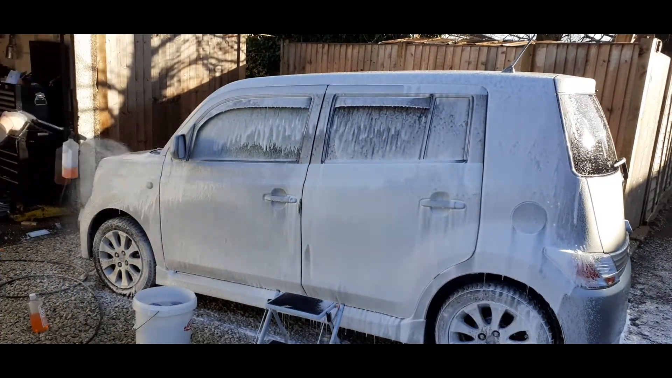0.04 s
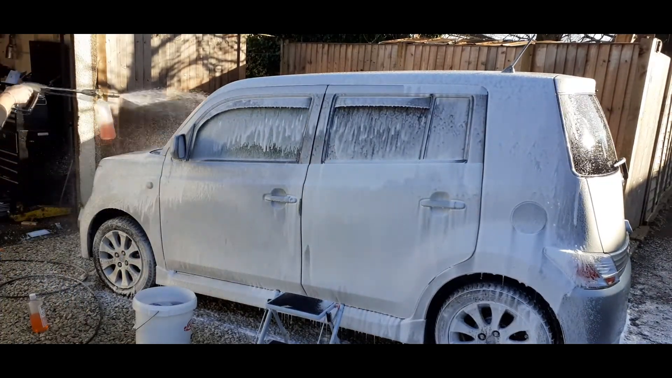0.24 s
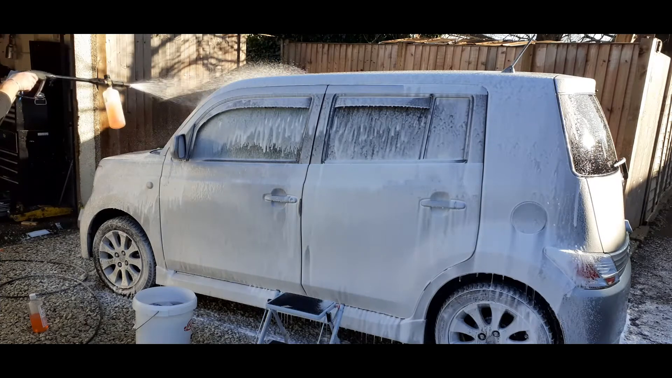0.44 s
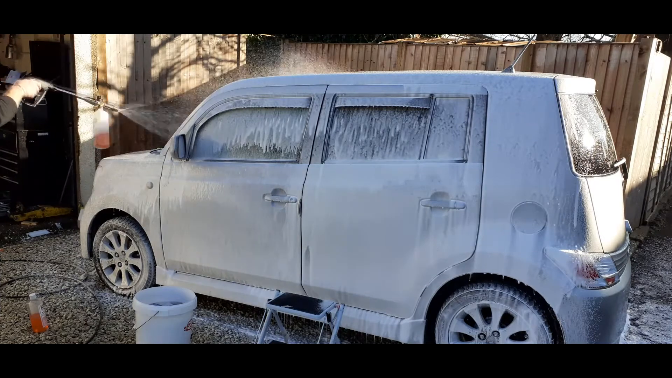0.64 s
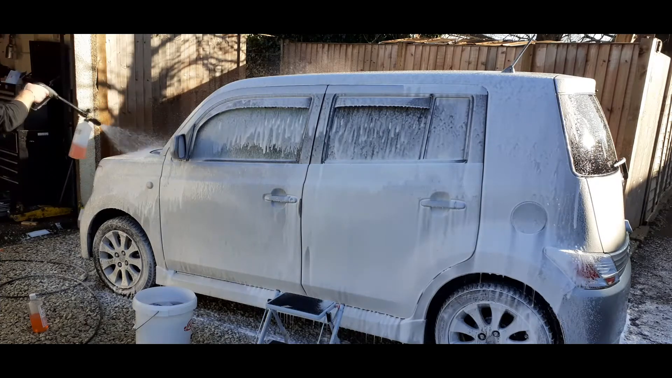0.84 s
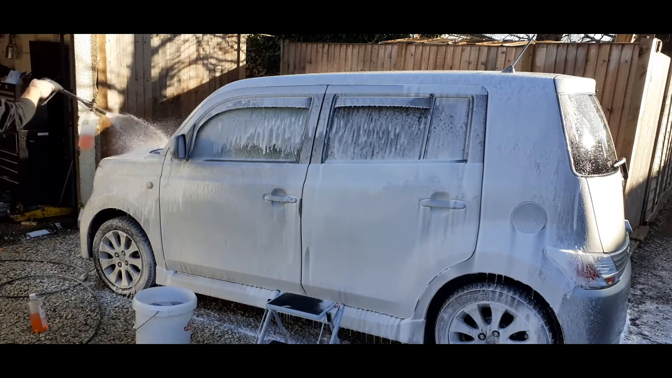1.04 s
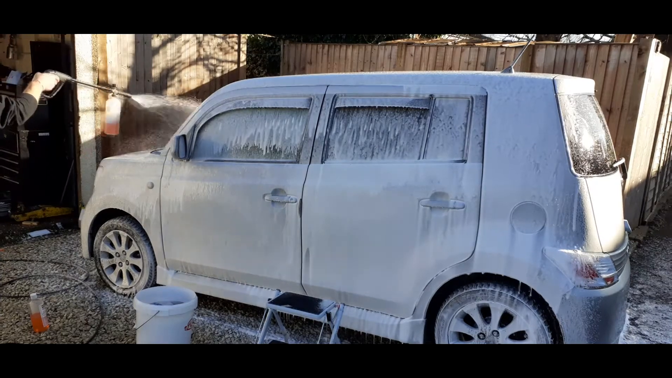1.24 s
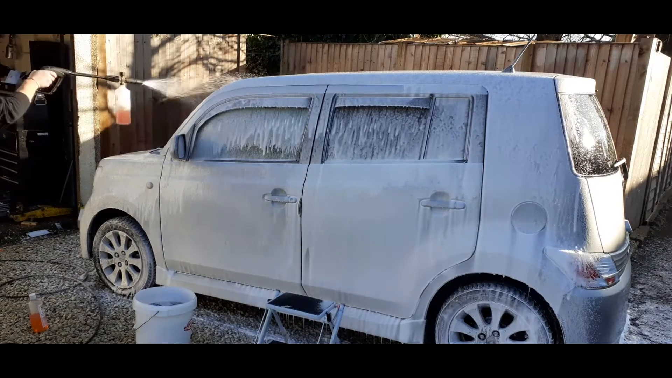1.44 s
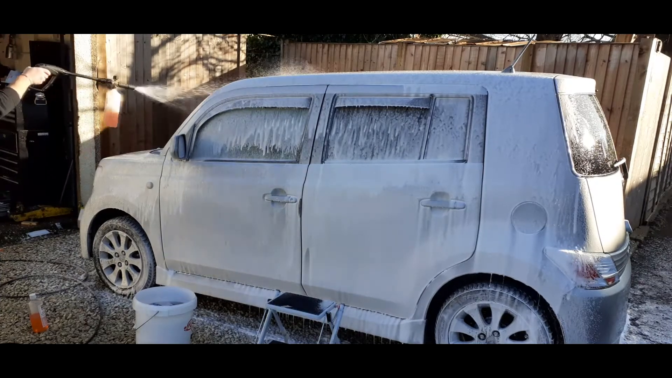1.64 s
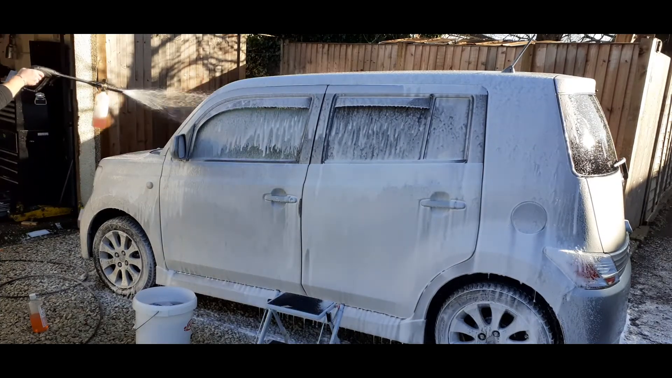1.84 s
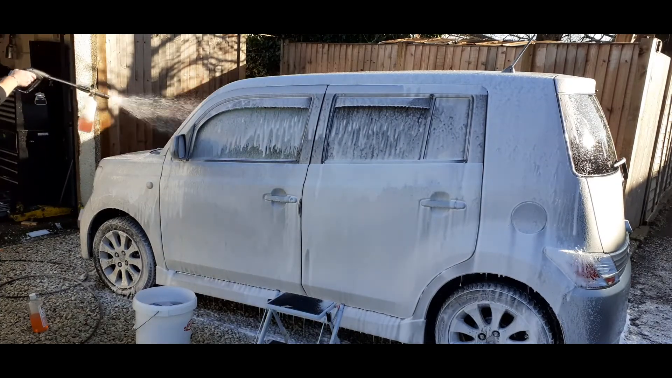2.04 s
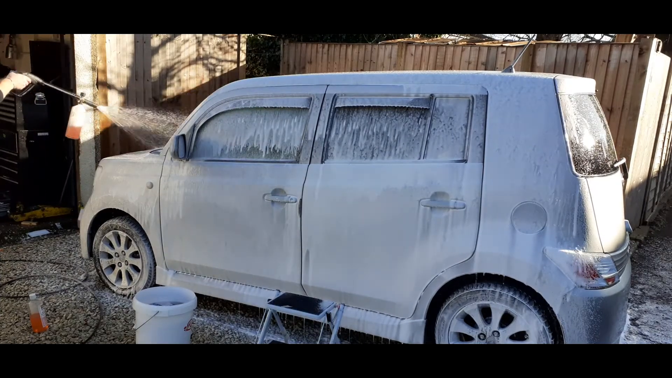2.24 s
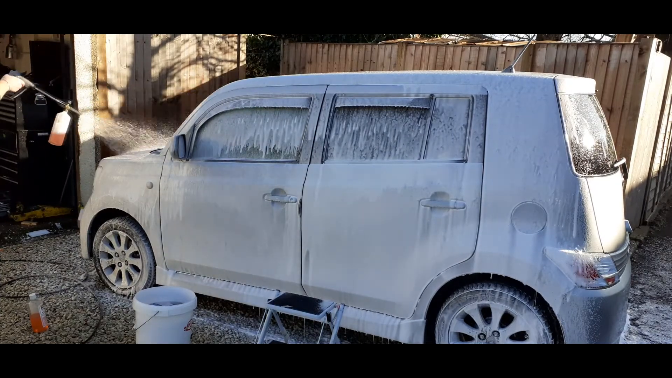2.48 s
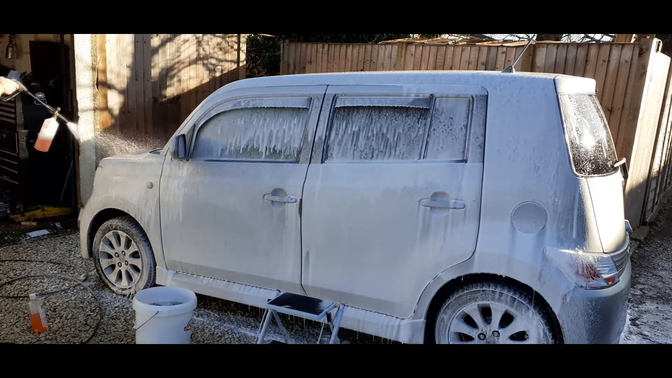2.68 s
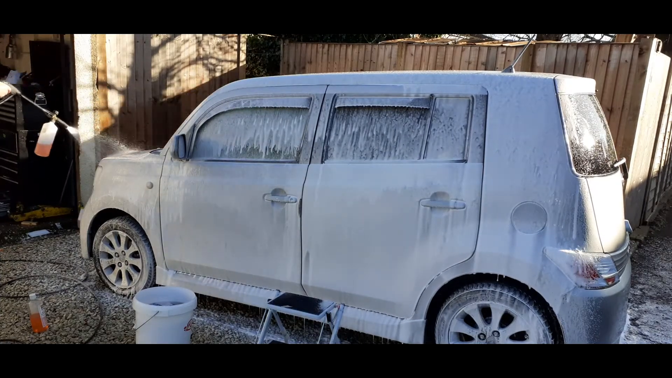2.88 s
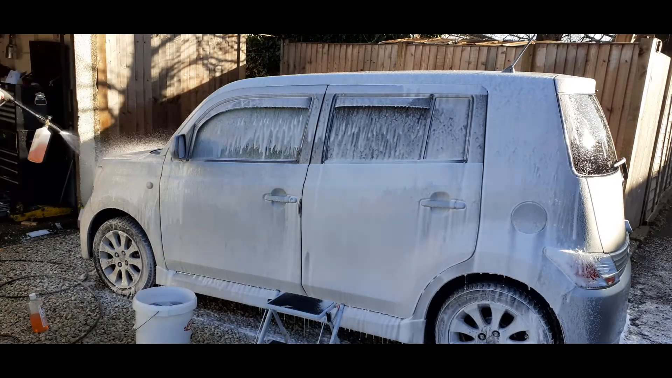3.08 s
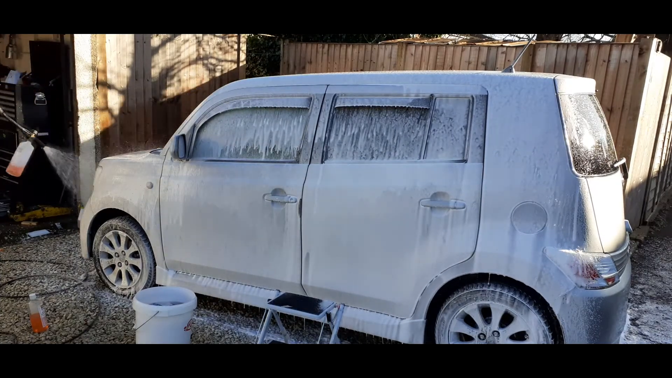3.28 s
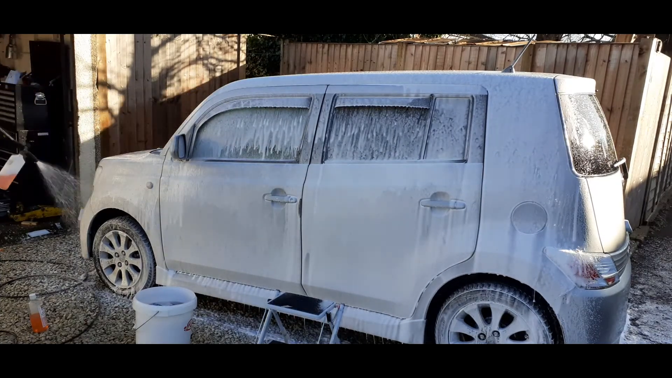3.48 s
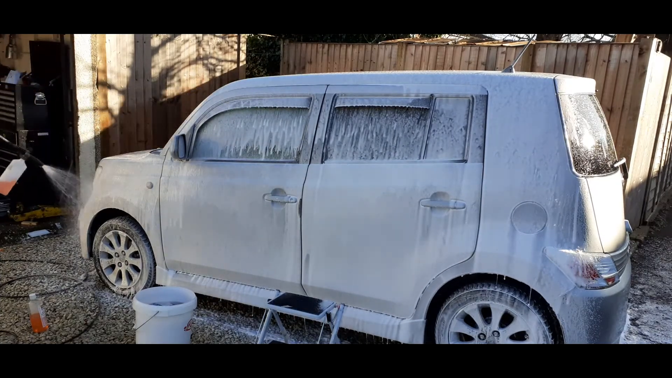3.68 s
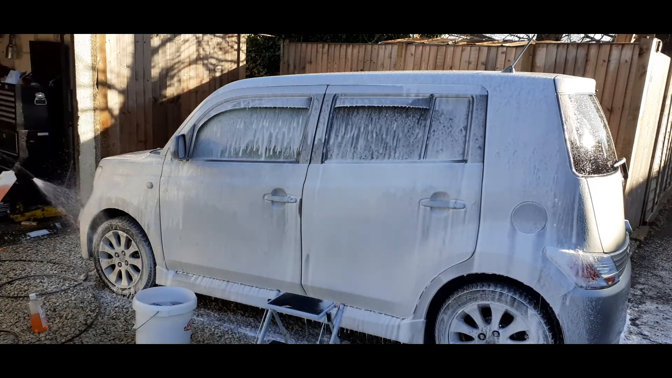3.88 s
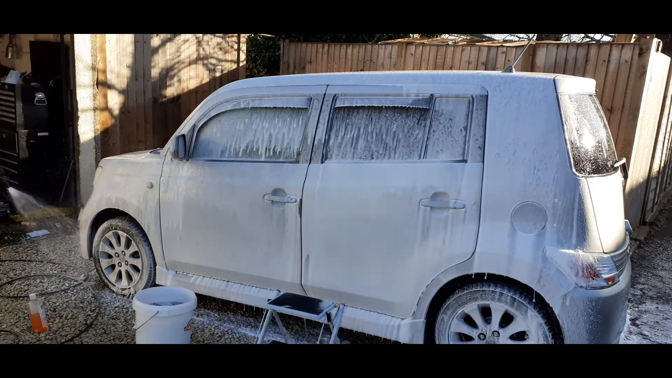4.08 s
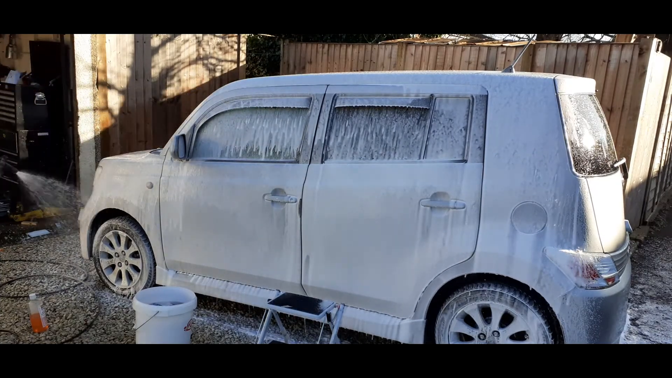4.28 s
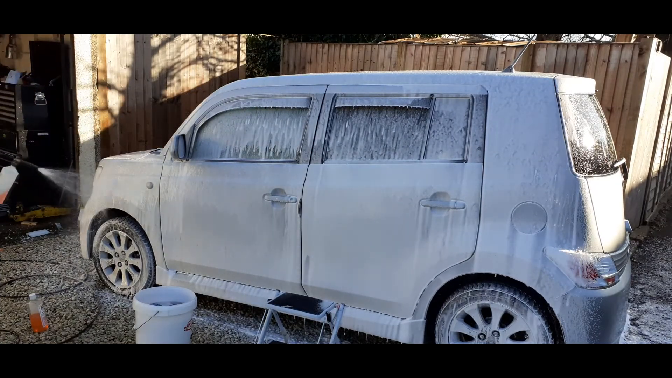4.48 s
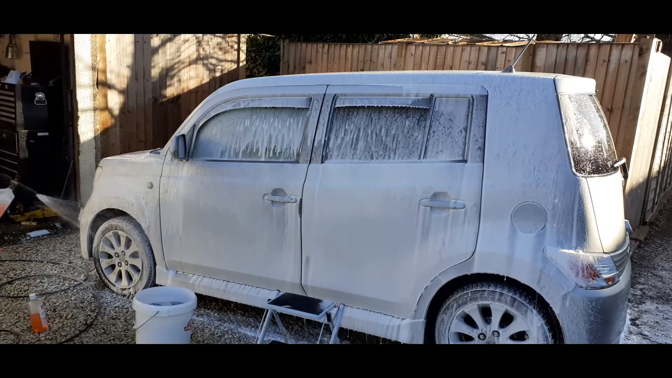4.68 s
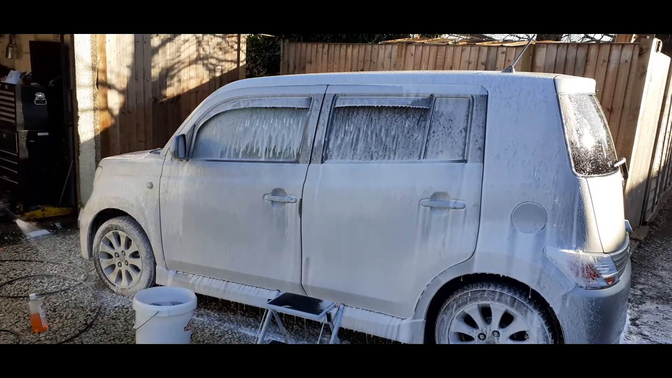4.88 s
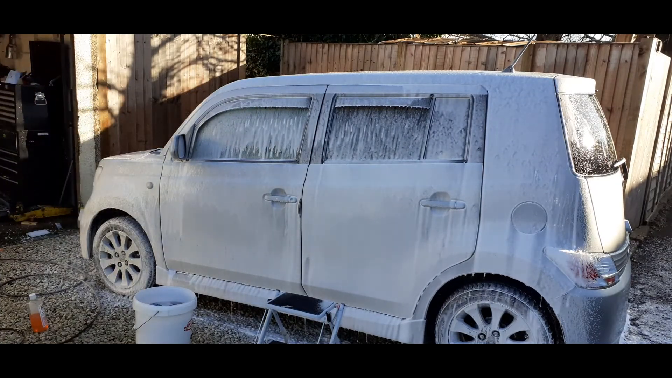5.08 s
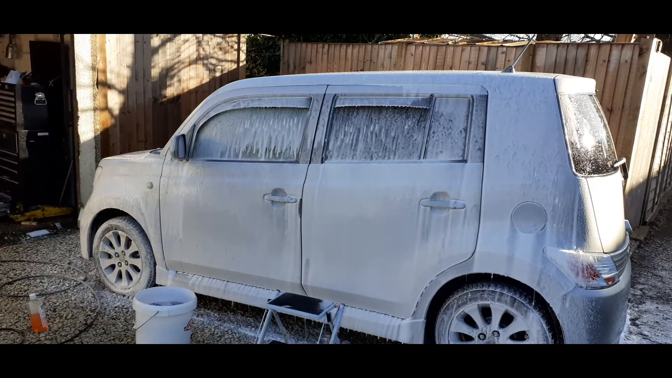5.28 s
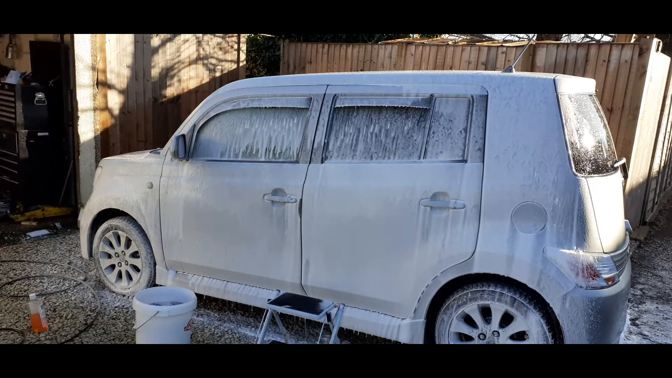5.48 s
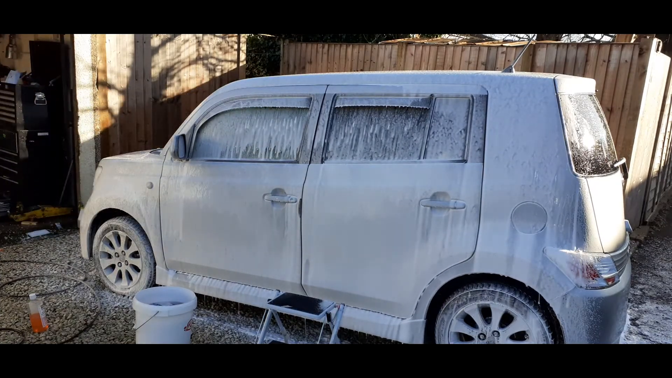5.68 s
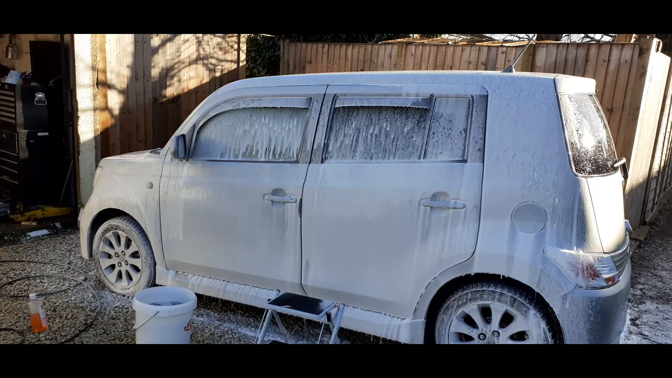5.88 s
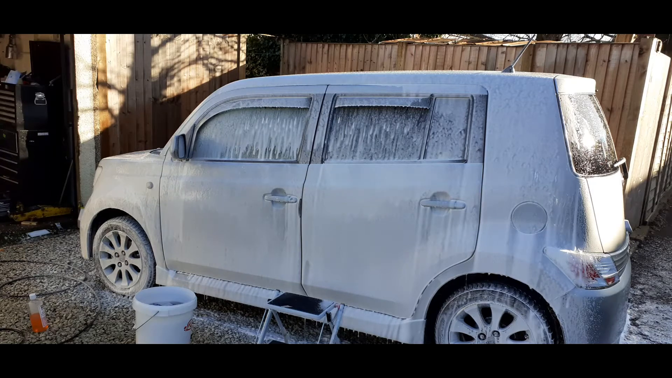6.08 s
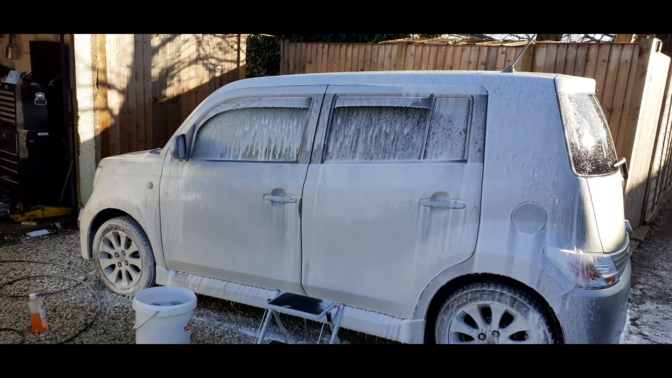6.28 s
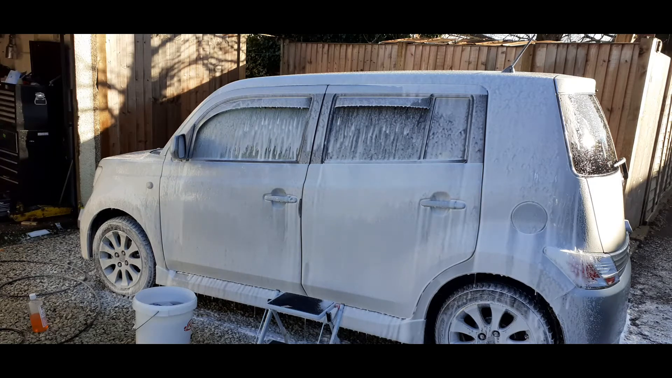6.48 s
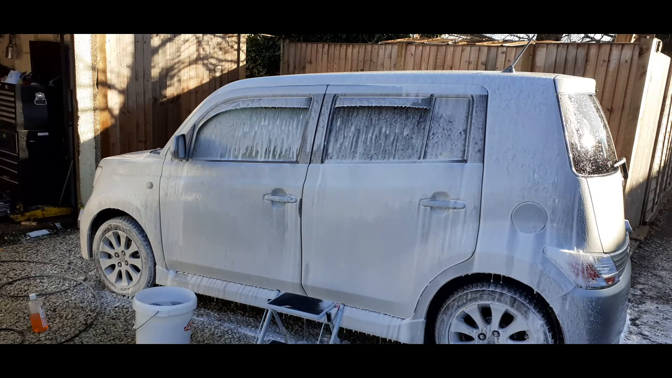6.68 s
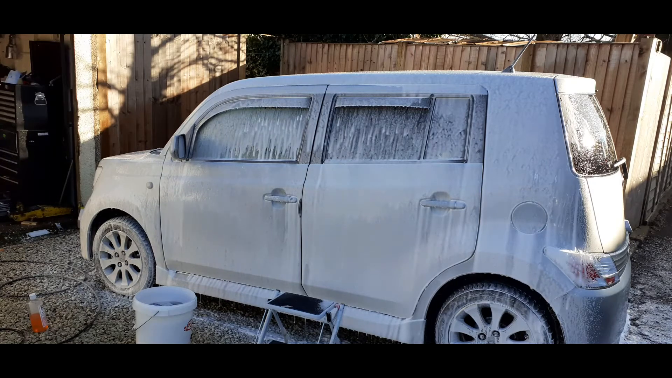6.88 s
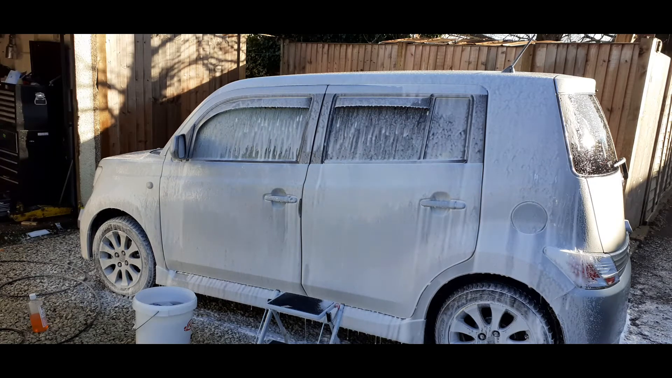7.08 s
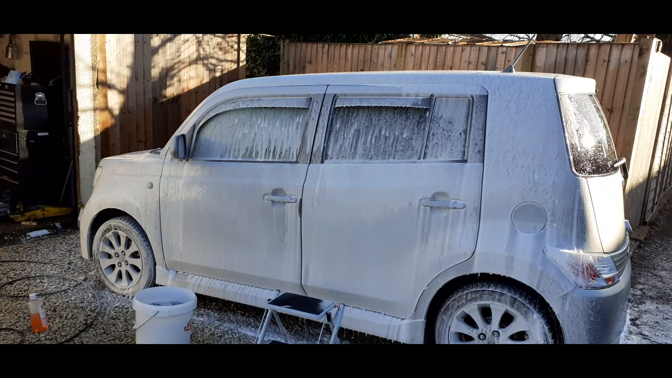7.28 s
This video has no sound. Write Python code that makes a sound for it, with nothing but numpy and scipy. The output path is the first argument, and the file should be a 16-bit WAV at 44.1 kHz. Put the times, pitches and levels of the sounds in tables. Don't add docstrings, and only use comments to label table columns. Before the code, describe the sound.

Outdoors, a steady pump hum and roaring foam spray cut out at five seconds, the valve squeals and spits, leaving quiet rustles and gravel steps.

```python
import sys
import numpy as np
from scipy import signal
from scipy.fft import rfft, irfft
from scipy.io import wavfile

SR = 44100
rng = np.random.default_rng(int(sys.argv[2]) if len(sys.argv) > 2 else 0)


def volts(x):
    e = np.asarray(x, float) / 20
    return 10 ** e


def to_wav(s):
    ch = np.atleast_2d(s).T
    pcm = np.round(np.clip(ch, -1, 1) * 32767)
    wavfile.write(sys.argv[1], SR, pcm.astype(np.int16))


N = 323234

# time_s, turns_per_s
SHAFT = [(0, 82.07), (0.5, 82.07), (1.5, 81.92), (2.0, 81.81), (2.5, 81.81), (3.0, 81.98), (4.5, 82.21)]
# multiple of shaft speed, level_db, left_over_right_db, right_lag_rad
PUMP_TONES = [(2, -53, 4, 0.3), (3, -44.5, 8, 0.2), (3.5, -60, 2, 0.4), (4, -45, 4, 0.4), (5, -47, 1, 0.7),
              (6, -41.2, 2, 0.2), (7, -46, 2, 1.1), (8, -44.5, 4, 1.3), (9, -44, -3, 0.8),
              (11, -54, 10, 1.4), (12, -47.5, -2, 1.0), (13, -53, 3, 2.4), (14, -51, 6, 2.2),
              (15, -52, 2, 2.4), (16, -53, 2, 2.7), (17, -53, 1, 2.0), (18, -54, 16, -2.6),
              (19, -53, 7, 0.8), (20, -41, 0, -0.9), (21, -45, 1, 3.0), (22, -50, 7, -2.5),
              (23, -38, 7, -3.0), (24, -50, 3, -2.9), (25, -54, 2, 1.3), (26, -49, 0, -1.0),
              (27, -53, 0, -2.8), (29, -46, 1, -1.0), (30, -52, 1, -1.8), (39, -53, 6, -0.8),
              (45, -46, 0, -0.3)]
# multiple, left_db, right_db, left_offset_rad, right_offset_rad
ROTOR_TONES = [(2, -63, -65, -2.6, -2.5), (3, -49.5, -52, 0.8, 0.8), (4, -44, -48, -0.8, -0.9),
               (5, -50, -54, 2.1, 2.6), (6, -55, -60, -1.0, -2.0), (7, -47, -57, -1.6, -0.9),
               (8, -47, -53, -2.3, -2.2)]
# multiple, middle_s, length_s, change_db
SHADOWS = [(3, 4.2, 2.2, -9), (9, 4, 1.7, -3), (12, 2.6, 2.2, 3.5), (15, 2.5, 1.4, -2), (21, 2.2, 1.6, -4),
           (22, 5.7, 2.0, 8), (17, 4.8, 2.2, -0.5), (18, 4, 2.47, 3), (26, 4.4, 2.2, 4.5)]
# time_s, level_db
POWER = [
    (0, -0.76),
    (4.99, 1.7),
    (5.03, -3),
    (5.07, -28),
    (5.12, -53),
]


def pump():
    turns = in_time(SHAFT)[0]
    angle = 2 * np.pi * np.cumsum(turns) / SR
    load_db = 6.5 * (82.0 - turns)
    rotor = {k: np.reshape(sides, (2, 2, 1)) for k, *sides in ROTOR_TONES}
    out = np.zeros((2, N))
    for k, level_db, pan_db, lag in PUMP_TONES:
        shadow_db = swells([row[1:] for row in SHADOWS if row[0] == k], .6)
        level = volts(level_db + load_db - 0.24 * drift(0.25) + 0.55 * drift(1.8)) * volts(shadow_db)
        phase = k * angle + .35 * k * k + .015 * k * drift(4) - [[0], [lag]]
        out += np.sqrt(2) * level * np.sin(phase) * volts([[pan_db / 2], [-pan_db / 2]])
        if k in rotor:
            beat_db, offset = rotor[k]
            out += np.sqrt(2) * volts(beat_db) * np.sin(phase + angle / 11 + offset)
    return out * volts(in_time(POWER)[0])


# time_s, level_db
PRESSURE = [(4.931, 0), (5.0, -5.5), (5.1, -14.5), (5.178, -13), (5.36, -17), (5.55, -31), (5.6, -39),
            (5.68, -46), (5.9, -58)]
# middle_s, length_s, swell_db
DRUMMING = [
    (.03, .12, -1.5),
    (.7, 0.15, -1),
    (1.52, .05, 2),
    (2.86, 0.046, 3),
    (3.02, 0.088, 3.5),
]
# pitch_hz, level_db_per_hz
CASING_COLOUR = [(60, -30), (100, -10), (200, -8.5), (290, -6), (370, -7), (460, -6), (550, -6), (630, -4),
                 (720, -1), (820, 0), (980, -2), (1120, -5), (1280, -8), (1600, -13)]


def casing():
    sinking = 0.61 * in_time([(s + 0.16, db) for s, db in PRESSURE])[0]
    level = volts(-36.5 + sinking + swells(DRUMMING, 0.034))
    return level * rush(CASING_COLOUR, shared_db=0.8, patchy_db=1.6, lag_s=0.0002)


def lance():
    return howl() + roar() + off_bodywork(hiss() + mist(), echo_db=-13, lag_s=.0015, sway_s=.0003)


def low_pressure():
    bleeding_s = np.maximum(np.arange(N) / SR - PRESSURE[1][0], 0)
    cut_s = 5.18
    air_cut = swells([(cut_s + 2, 4, -5), (cut_s + 0.042, .09, -10)], .04)
    return 0.45 * in_time(PRESSURE)[0] - 16 * bleeding_s + air_cut


# middle_s, length_s, mist_swell_db, sheen_hz
SWINGS = [(0.021, 0.17, 6.5, 13050), (.41, 0.36, 6.5, 11030), (0.851, 0.19, 3, 14020),
          (2.99, 0.23, 2, 11390), (3.821, 0.42, 7, 12760), (4.53, .33, 7, 13210), (4.871, 0.28, 6.5, 13000)]


def swing():
    return swells([row[:3] for row in SWINGS], 0.11)


# time_s, nearer_db
NEARER = [(0, 0), (.2, 1), (.66, -0.5), (.8, 0.5), (1.5, 0.5), (1.8, 0), (2.2, -0.5), (2.6, 0), (3.05, 2.5),
          (3.2, 1.5), (3.75, 2.5), (4.12, 3.5), (4.23, 1), (4.53, 4), (4.7, 2), (4.78, 3), (4.9, 1.5)]
# pitch_hz, level_db_per_hz
HISS_COLOUR = [(1470, -27), (2500, -4), (3230, 3), (3510, 3), (3570, 3.5), (4300, 2.5), (5880, 2.5),
               (7510, 1.5), (8980, -9), (9500, -5), (12400, -13), (20900, -120)]
# time_s, pitch_hz, over_hiss_db
NOZZLE = [(0.0, 6050, -6), (0.26, 6420, -9), (1.17, 5950, -4), (1.21, 6390, -5), (2.06, 6220, -7),
          (2.1, 5865, -7), (2.45, 6290, -5), (2.62, 5910, -9.5), (3.49, 5870, -5), (3.87, 6270, -13.5),
          (4.37, 5940, -10), (4.47, 6380, -8), (4.79, 5950, -8), (5.0, 6270, -18)]


def hiss():
    level_db = -32.5 + in_time(PRESSURE)[0] + in_time(NEARER)[0] + 0.067 * swing()
    nozzle_hz, nozzle_db = in_time(NOZZLE)
    spray = volts(level_db + 0.5) * rush(HISS_COLOUR, shared_db=.8, patchy_db=1.3, lag_s=.00017)
    ring = whistle(nozzle_hz, width_hz=900, alike=.3, lag_s=.00017)
    return spray + volts(level_db + nozzle_db + 1.5 * drift(4)) * ring


# pitch_hz, level_db_per_hz
MIST_COLOUR = [(6500, -6.5), (8500, 2), (9240, -9.5), (10600, 1.1), (13000, -3.5), (15000, -0.5),
               (17000, -1)]


def mist():
    shut_s = 5.57
    shutting = swells([(5.1, .08, -4), (shut_s + 2, 4, -21)], .04)
    toward = swing()
    level_db = -38 + 0.53 * in_time(PRESSURE)[0] + 0.88 * toward + 0.43 * in_time(NEARER)[0] + shutting
    fizz = volts(level_db) * rush(MIST_COLOUR, shared_db=0.5, patchy_db=1.4, lag_s=0.00015)
    return fizz + volts(level_db - 6.5 + 0.7 * toward) * sheen()


def sheen():
    glide = []
    for s, length, _, hz in SWINGS:
        for side in (-.9, .9):
            offset_s = side * length / 2
            glide.append((s + offset_s, hz + offset_s * 5500))
    return whistle(in_time(glide)[0], width_hz=2500, alike=.3, lag_s=.00016)


# pitch_hz, level_db_per_hz
ROAR_COLOUR = [(750, -30), (1050, -9), (1300, -5), (1550, -4), (1800, -1), (2100, 0), (2450, -4),
               (2770, -6), (3400, -8), (4400, -30)]


def roar():
    level = volts(-41 + low_pressure() + 0.12 * swing() + 5)
    return level * rush(ROAR_COLOUR, shared_db=-0.5, patchy_db=1.2, lag_s=0.00026)


# middle_s, swell_db, pitch_hz
GULPS = [(.03, 7, 1930), (0.169, 14.5, 1881), (.4, 2, 1900), (.66, 11, 2062), (0.821, 7, 1903),
         (1.42, 7, 1943), (1.84, 9, 1904), (2.13, 10.5, 1868), (2.61, -3, 1864), (2.94, 12, 2035),
         (3.15, -3, 1830), (3.62, 10, 1855), (3.9, 3, 1857), (4.54, 11, 1822), (4.711, 4, 1934)]


def howl():
    gulps_db = swells([(s, 0.075, db) for s, db, _ in GULPS], 0.12)
    hz = in_time([(s, hz) for s, _, hz in GULPS])[0] + 25 * drift(4.935)
    level = volts(-37 + low_pressure() + gulps_db + 2.1 * drift(5.4) - 3.5)
    return level * whistle(hz, width_hz=200, alike=0.18, lag_s=0.00011)


def off_bodywork(x, echo_db, lag_s, sway_s):
    at = np.arange(N) - SR * (lag_s + sway_s * drift(0.904))
    return x + volts(echo_db) * np.array([np.interp(at, np.arange(N), side) for side in x])


# time_s, pitch_hz, level_db
BONNET = [(.08, 994, -62), (.16, 962, -38), (.4, 857, -40), (.7, 752, -35.5), (1.0, 723, -47),
          (1.5, 765.4, -49), (2.9, 803, -44), (3.5, 793, -50)]


def bonnet():
    hz, level_db = in_time(BONNET + [(3.8, 800, -90)])
    return volts(level_db + 2.0 * drift(8.5)) * whistle(hz, width_hz=137, alike=0.75, lag_s=0.00017)


# start_s, peak_db, pitch_hz, fade_60db_s
THUD = [
    (5.043, -25, 128, 0.087),
    (5.055, -31.5, 655, 0.33),
    (5.577, -29, 770, 0.051),
]


def thud():
    out = np.zeros(N)
    for s, peak_db, hz, t60 in THUD:
        age = np.maximum(np.arange(N) / SR - s, 0)
        rise = np.minimum(age / 0.012, 1)
        out += volts(peak_db - 60 * age / t60) * rise * np.sin(2 * np.pi * hz * age)
    return out


def coasting():
    t = np.arange(N) / SR
    start_s, rest_s = 4.99, 5.6
    turning = np.clip(np.minimum(t - start_s, rest_s - t) / 0.027 + 1, 0, 1)
    level = volts(-42.5 - 9 * (t - start_s) + 2.7 * drift(9.2) - 6.5)
    return turning * level * band_noise(98, 309.6, channels=1)


# time_s, pitch_hz, level_db
SQUEAL = [(5.112, 3230, -58), (5.128, 3230, -40), (5.16, 3220, -37), (5.222, 3030, -41),
          (5.238, 2990, -31.5), (5.285, 2945, -33.5), (5.31, 2900, -39), (5.39, 2760, -43),
          (5.47, 2750, -48),
          (5.515, 2780, -58),
    (5.535, 2850, -43),
    (5.565, 2840, -54),
    (5.6, 2810, -60),
    (5.655, 2815, -64),
]


def valve_squeal():
    hz, level_db = in_time([(5.09, 3230, -91)] + SQUEAL + [(5.7, 2820, -100)])
    level_db = level_db + .8 * drift(30)
    breakup_s = 5.31
    broken = swells([(5.16, .12, .55), (breakup_s + .1, .2, 1), (5.7, .36, .45)], .04)
    angle = 2 * np.pi * np.cumsum(hz + 16 * drift(50)) / SR
    clear = np.sqrt(2) * np.sin(angle - [[0], [4.6]])
    squeal = volts(-2 - 5 * broken) * clear
    squeal += volts(-11) * whistle(hz, width_hz=260, alike=.75, lag_s=.00026)
    squeal += broken * volts(-3) * whistle(hz + 20, width_hz=330, alike=.7, lag_s=.00026)
    squeal += volts(-19) * whistle(hz / 2, width_hz=120, alike=0.39, lag_s=.00026)
    squeal += volts(-21.0) * whistle(2 * hz, width_hz=180, alike=.4, lag_s=0.00052)
    for ratio in (1.53, 2.25, 2.68):
        body = whistle(ratio * hz, width_hz=360, alike=0.4, lag_s=.00026)
        squeal += volts(-16 + 2.8 * drift(5.9)) * body
    return volts(level_db + 5.5) * squeal


# middle_s, length_s, level_db, pitch_hz
SPITS = [
    (5.07, 0.035, -43, 3370),
    (5.258, .06, -56, 3830),
    (5.402, .06, -52, 3950),
    (5.46, .05, -54, 3990),
    (5.547, 0.057, -57, 4070),
]


def valve_spits():
    level = sum(volts(db) * swells([(s, length, 1)], .02) for s, length, db, _ in SPITS)
    hz = in_time([(s, pitch) for s, *_, pitch in SPITS])[0]
    return level * volts(1.5) * whistle(hz, width_hz=280, alike=0.45, lag_s=0.00022)


# time_s, pitch_hz, level_db
LEAK = [
    (5.54, 5900, -85),
    (5.6, 5900, -72),
    (5.95, 5900, -76),
    (6.2, 5905, -85),
    (6.27, 5905, -100),
]


def leak():
    hz, level_db = in_time(LEAK)
    level = volts(level_db + 1.5 * drift(25))
    tone = np.sin(2 * np.pi * np.cumsum(hz + 6 * drift(19.44)) / SR)
    return level * tone * volts([[3.5], [-3.5]])


# pitch_hz, level_db_per_hz
GRAVEL_COLOUR = [(880, -25), (1500, -4), (3480, -8.5), (4450, -10), (8010, -6.5), (9300, -20), (11600, -11),
                 (17000, -25)]
# start_s, peak_db, stone_hz, brightness_db, sole_knock_db
STEPS = [
    (6.2963, -34.5, 3270, -17, -32),
    (6.4344, -53, 2500, -13, -51),
    (6.5226, -35, 3960, -22, -41),
    (6.5444, -52, 2700, -18, -42),
    (6.5844, -49, 3070, -20, -51),
    (6.71, -36.5, 3240, -19, -36),
    (7.121, -26, 4270, -9.5, -22.5),
    (7.227, -37, 2500, -20, -44),
    (7.2579, -26, 3550, -10.5, -41),
    (7.3044, -35, 3380, -5, -49),
]


def steps():
    hits = rng.random((3, N)) < 3500 / SR
    force = volts(4.3 * np.minimum(rng.exponential(1, (3, N)), 3))
    grains = hits * force * rng.choice([-1, 1], (3, N))
    common, *own = rms_one(tint(grains, GRAVEL_COLOUR))
    crunch = heard(common, np.array(own), 0.38, 0.00024)
    dull = tint(crunch, [(4200, 0), (6000, -30)])
    sole = band_noise(410, 1160, channels=2)
    crack = band_noise(5000, 12000, channels=2)
    out = np.zeros((2, N))
    for s, peak_db, hz, bright_db, knock_db in STEPS:
        t60 = 0.25 * volts(min(-27 - knock_db, 0))
        age = np.maximum(np.arange(N) / SR - s, 0)
        rise = np.minimum(age / .001, 1)
        stone = volts(-3.5 + 0.3 * bright_db - 60 * age / 0.016) * np.sin(2 * np.pi * hz * age)
        grind = volts(-12.0 - 60 * age / max(t60, .02)) * (dull + volts(bright_db + 5.5) * (crunch - dull))
        grind += volts(bright_db - 3 - 60 * age / 0.022) * crack
        out += volts(peak_db) * (stone + rise * grind)
        out += rise * volts(knock_db - 7.5 - 60 * age / 0.096) * sole
    return out


# start_s, peak_db, pitch_hz, fade_60db_s
STONES = [(5.582, -37, 895, .03), (6.297, -41, 2450, .025), (6.306, -45, 3200, .02),
          (6.306, -47, 4000, 0.018), (6.31, -41, 1480, .12), (6.472, -55, 7200, .008),
          (6.472, -50, 3500, .01), (6.526, -58, 8000, .012), (6.582, -49, 3700, .015),
          (6.701, -47, 3500, .012), (6.712, -58, 7800, .012), (7.1215, -35, 8200, 0.016),
          (7.123, -29, 1240, 0.045), (7.143, -31, 653, 0.064), (7.269, -40, 8200, .012),
          (7.273, -40, 6100, .012), (7.281, -42, 3900, .015), (7.284, -35, 610, .08),
          (7.309, -38, 7700, .012), (7.31, -38, 4700, .01)]


def stones():
    out = np.zeros((2, N))
    for s, peak_db, hz, t60 in STONES:
        age = np.maximum(np.arange(N) / SR - s - np.array([[0], [.00024]]), 0)
        out += volts(peak_db - 60 * age / max(t60, .004)) * np.sin(2 * np.pi * hz * age)
    return out


# pitch_hz, level_db_per_hz
RUSTLE_COLOUR = [(1290, -25.5), (2200, -6.5), (4500, -5.5), (5500, -13), (8000, -15), (9300, -21),
                 (11000, -16), (17000, -16)]
# middle_s, length_s, swell_db
RUSTLES = [(5.53, 0.88, 19.5), (6.48, 0.16, 25), (6.835, 0.36, 12.5), (6.33, .12, 8), (7.2, 0.41, 25)]


def rustle():
    level = volts(-82.5 + swells(RUSTLES, 0.22) - 5.0)
    return level * rush(RUSTLE_COLOUR, shared_db=1.5, patchy_db=.8, lag_s=.00026)


# time_s, level_db
TRAFFIC = [
    (5.6, -50),
    (6.2, -48),
    (6.65, -44),
    (7.07, -45),
    (7.33, -41.5),
]
# pitch_hz, level_db_per_hz
YARD_COLOUR = [(24, -21.5), (66, -0.5), (143, -13.5), (398, -15), (578, -8.5), (1160, -13), (1530, -18),
               (3000, -37), (4500, -43.5), (7500, -50), (9400, -60), (11000, -49), (17000, -41.5)]


def traffic():
    level = volts(in_time(TRAFFIC)[0] + 1)
    return level * rush(YARD_COLOUR, shared_db=0.2, patchy_db=-0.8, lag_s=0.00036)


# middle_s, length_s, swell_db
GUSTS = [(1.9, .3, 3), (2.48, .12, 9), (3.1, .5, 7), (5.05, .15, 9), (6.57, .12, 13), (6.7, .11, 22),
         (6.79, .09, 19), (7.13, .15, 12)]


def wind():
    common, *own = band_noise(48, 104.0, channels=3)
    level = volts(-64.5 + swells(GUSTS, .07) - 7 * drift(3))
    return level * heard(common, np.array(own), .55, 0.) * volts([[4], [-5]])


# pitch_hz, likeness from 0 to 1
LIKENESS = [(60, .68), (300, .87), (900, .65), (1500, .48), (2000, .6), (3000, .42), (8000, .3),
            (13000, .44)]


def rush(colour, shared_db, patchy_db, lag_s):
    octaves = np.log2(colour[-1][0] / colour[0][0])
    edges = colour[0][0] * 2 ** np.arange(-.25, octaves + .5, .5)
    edges = np.minimum(edges, .46 * SR)
    together = 0.35 * drift(1.6) + 0.21 * drift(35)
    white = tint(rng.standard_normal((2, 4, N)), colour)
    white[:, 1] = delayed(white[:, 0], lag_s)
    out = 0
    for k, (low, high) in enumerate(zip(edges, edges[1:])):
        alike = np.clip(at_hz(LIKENESS, np.sqrt(low * high)), 0, 1)
        mixed = np.sqrt(alike) * white[k % 2, :2] + np.sqrt(1 - alike) * white[k % 2, 2:]
        band = signal.sosfilt(signal.butter(2, [low, high], "band", fs=SR, output="sos"), mixed)
        out = out + band * volts(shared_db * together + patchy_db * drift(17.0))
    return out / np.std(out.mean(axis=0))


def whistle(hz, width_hz, alike, lag_s):
    turn = np.exp(2j * np.pi * np.cumsum(hz) / SR)
    lowpass = signal.butter(2, width_hz / 2, fs=SR, output="sos")
    slow = signal.sosfilt(lowpass, rng.standard_normal((2, 3, N)))
    common, *own = np.real((slow[0] + 1j * slow[1]) * turn)
    return rms_one(heard(common, np.array(own), np.clip(alike, 0, 1), lag_s))


def band_noise(low_hz, high_hz, channels):
    bandpass = signal.butter(3, [low_hz, high_hz], "band", fs=SR, output="sos")
    return rms_one(signal.sosfilt(bandpass, rng.standard_normal((channels, N))))


def heard(common, own, alike, lag_s):
    late = delayed(common, lag_s)
    return np.sqrt(alike) * np.array([common, late]) + np.sqrt(1 - alike) * own


def tint(x, points, lag_s=0.):
    hz = np.fft.rfftfreq(x.shape[-1], 1 / SR) + 1
    lag = np.exp(-2j * np.pi * hz * lag_s)
    return irfft(rfft(x) * volts(at_hz(points, hz)) * lag, x.shape[-1])


def delayed(x, lag_s):
    return tint(x, [(1, 0), (SR, 0)], lag_s)


def drift(rate):
    r = np.exp(-80 * np.pi * rate / SR)
    slow = signal.lfilter([1], [1, -2 * r, r * r], rng.standard_normal(N // 40 + 2002))[2000:]
    return np.interp(np.arange(N) / 40, np.arange(len(slow)), rms_one(slow))


def swells(rows, edge_s):
    t = np.arange(N) / SR
    return sum(height * np.clip((length / 2 - abs(t - s)) / edge_s + .5, 0, 1) for s, length, height in rows)


def in_time(rows):
    s, *columns = np.transpose(rows)
    return [np.interp(np.arange(N) / SR, s, c) for c in columns]


def at_hz(points, hz):
    table_hz, level_db = np.transpose(points)
    return np.interp(np.log(hz), np.log(table_hz), level_db)


def rms_one(x):
    return x / np.sqrt(np.mean(x ** 2) + 1e-20)


# pitch_hz, left_over_right_db
LEFT_OVER_RIGHT = [(60, 4.5), (110, 0.5), (200, 2.5), (380, 2), (700, 5.5), (1290, 1.5), (2380, 5),
                   (4400, 1.5), (8120, 4.5), (15000, 2.5)]


def scene():
    machine = casing() + lance() + bonnet() + thud() + coasting() + valve_squeal() + valve_spits()
    left, right = machine + steps() + stones() + rustle() + traffic()
    left = tint(left, [(hz, db / 2) for hz, db in LEFT_OVER_RIGHT])
    right = tint(right, [(hz, -db / 2) for hz, db in LEFT_OVER_RIGHT])
    return np.array([left, right]) + pump() + leak() + wind()


def band_limit(x):
    return signal.sosfilt(signal.butter(12, 15770, fs=SR, output="sos"), x)


def record(dry):
    cutoff_hz = 15770
    cut = tint(dry, [(cutoff_hz - 30, 0), (cutoff_hz + 30, -90)])
    return band_limit(cut)


dry = scene()
out = record(dry)
to_wav(out)
```